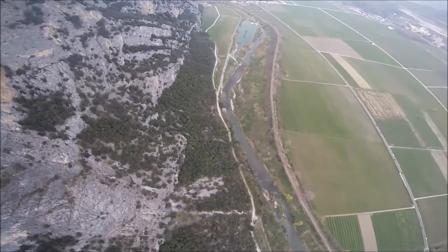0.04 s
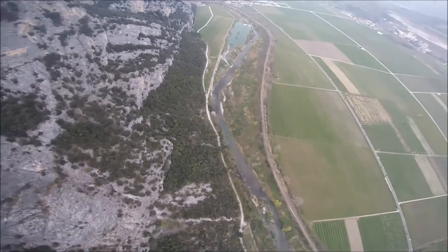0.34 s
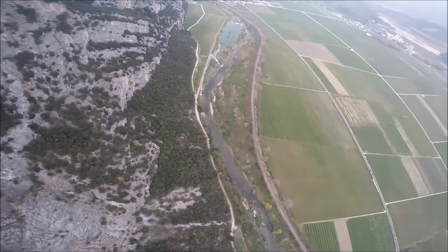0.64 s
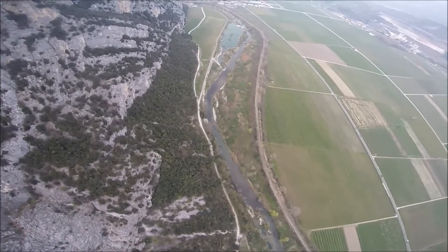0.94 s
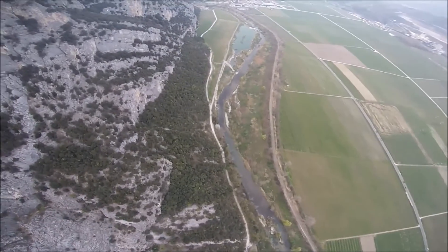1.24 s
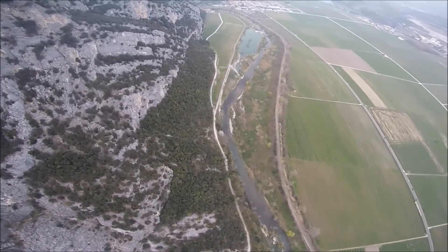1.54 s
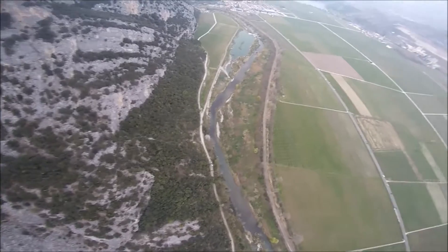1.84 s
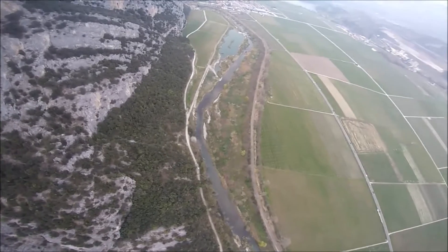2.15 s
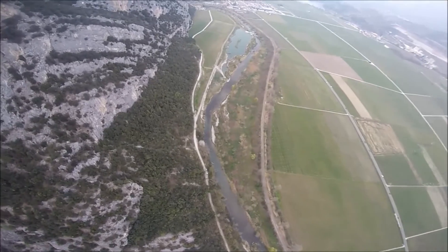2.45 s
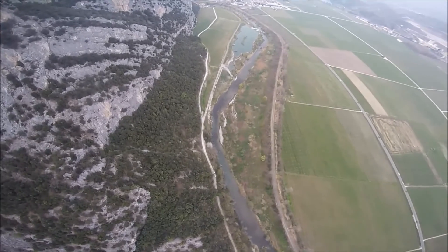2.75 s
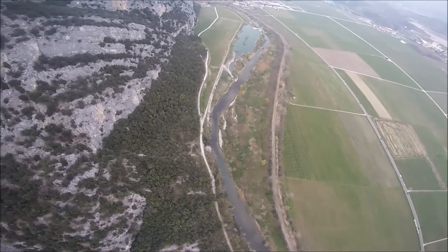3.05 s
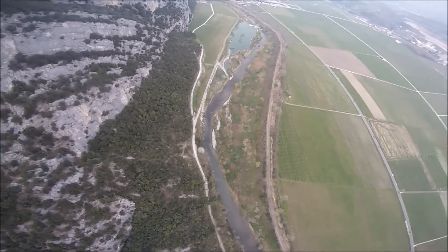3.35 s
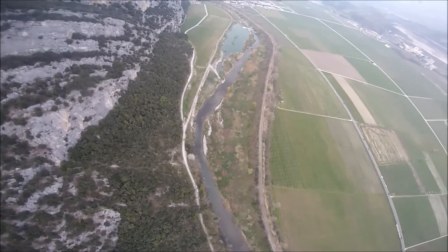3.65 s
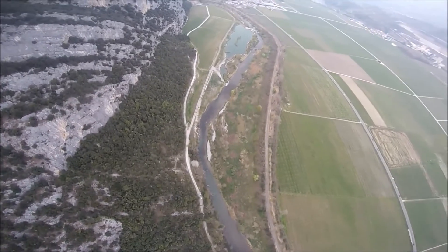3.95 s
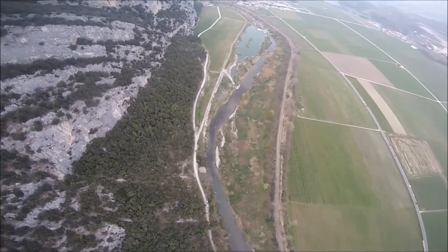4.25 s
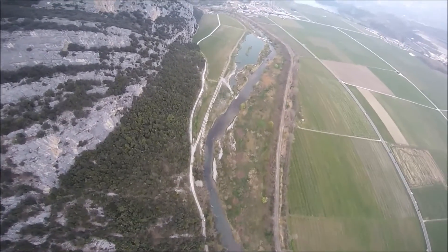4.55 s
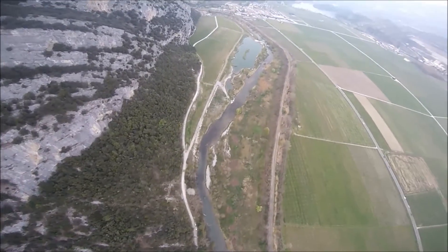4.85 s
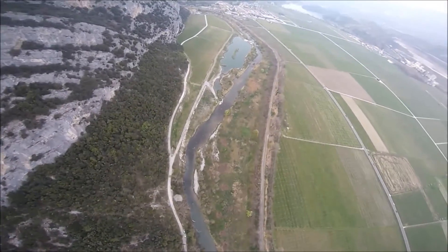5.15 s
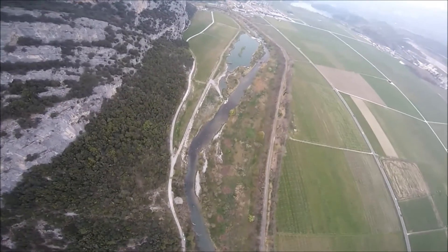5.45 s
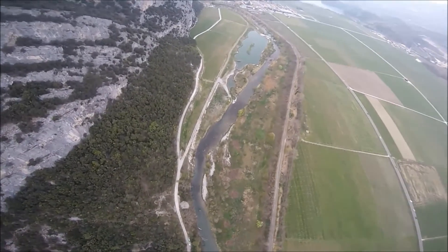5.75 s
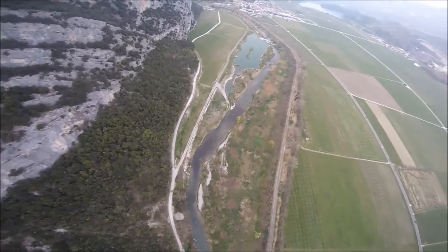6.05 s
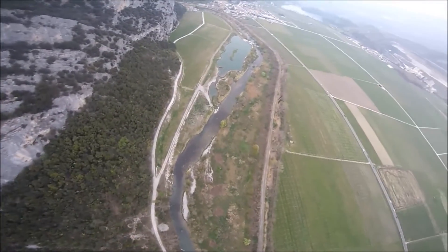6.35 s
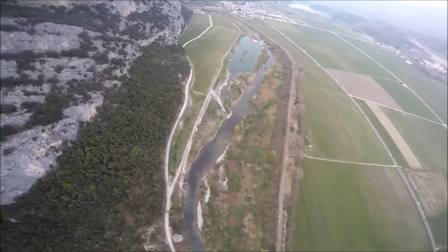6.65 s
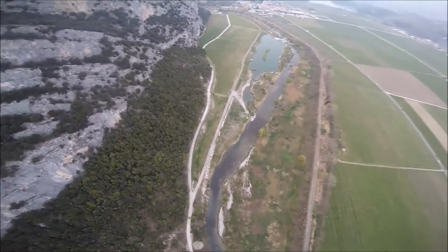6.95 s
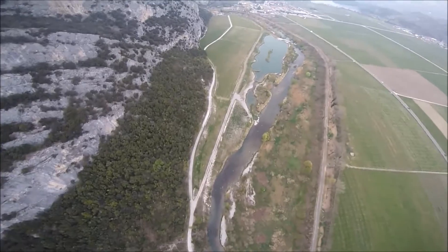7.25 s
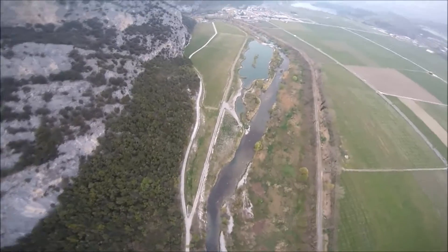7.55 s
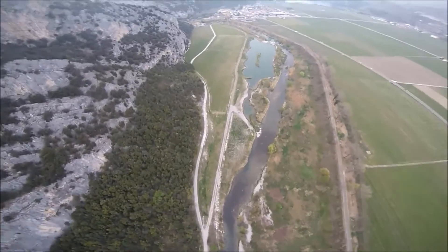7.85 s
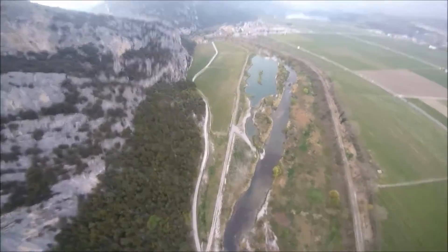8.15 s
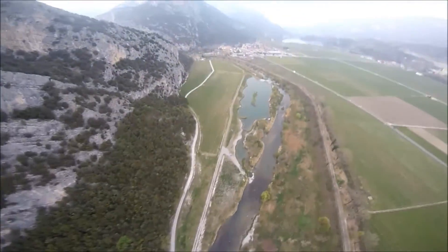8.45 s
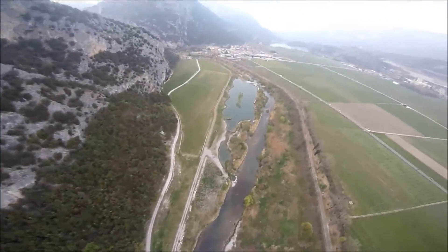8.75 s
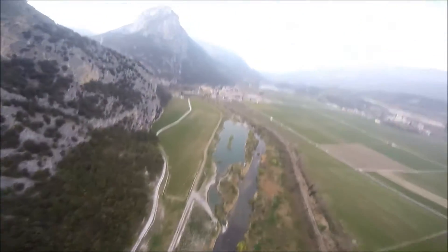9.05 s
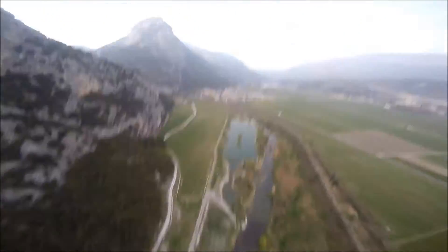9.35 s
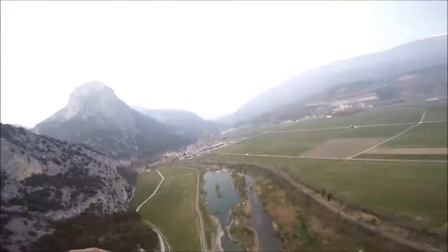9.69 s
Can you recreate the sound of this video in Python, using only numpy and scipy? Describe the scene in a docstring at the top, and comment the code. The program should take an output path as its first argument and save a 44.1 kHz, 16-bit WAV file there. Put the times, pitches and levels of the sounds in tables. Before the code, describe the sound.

Heard close from the helmet of someone falling along a rock face, turbulent air roars and hisses without pause, with low buffeting, fluttering clothing and a hollow whistling tone. Late on, the roar grows and short high swishes pass. Then the parachute cracks open twice in quick succession with deep harness tugs, the rush falls away sharply, and the canopy crackles and flaps faintly.

```python
"""Turbulent air roars through the resonant housing of a helmet camera in freefall beside a cliff.
A cavity howls, eddies thud and shake the mount, straps and suit flutter. Near the end edges whistle
and fabric streams out; the canopy opens with two hard snaps and heavy tugs, its cloth crackles,
and the wind drops to a few soft flaps."""
import sys
import numpy as np
from scipy import signal
from scipy.fft import rfft, irfft
from scipy.io import wavfile

SR = 44100
rng = np.random.default_rng(int(sys.argv[2]) if len(sys.argv) > 2 else 0)


def store_pcm(level_fs):
    """Save levels as 16-bit WAV."""
    pcm = np.round(np.clip(level_fs, -1, 1) * 32767).astype(np.int16)
    wavfile.write(sys.argv[1], SR, np.atleast_2d(pcm).T)


N = 437472
TIME_S = np.arange(N) / SR
BINS_HZ = np.maximum(np.fft.rfftfreq(N, 1 / SR), 1)
USUAL_TURBULENCE_DB = -37  # excess_db counts from here

# broad spectrum of air at the housing: f/Hz, level/dB
AIR_SPECTRUM = [(150, -21.5), (450, -19), (790, -18), (900, -8), (1290, -7.5), (1500, -1), (1900, 2.5),
                (3560, -0.5), (3740, -4), (4620, -8.5), (4880, -16.5), (7700, -25), (11300, -30.5),
                (15000, -43.5)]


def rush(churn, flow_gain, excess_db, lift):
    """Churning air through the housing: roar, mid band and hiss; the roar grows as the head lifts."""
    # housing peaks and dips: f/Hz, width/Hz, level/dB
    resonances = [(2410, 86, 2.5), (2680, 130, 4), (2840, 150, -0.5), (3100, 230, 2.5), (3430, 570, 4),
                  (4210, 160, 2), (4580, 140, 3.5), (5430, 340, 5), (5735, 230, 6), (6500, 400, -2),
                  (7130, 260, 2.5), (8300, 390, -5.5), (10740, 550, 2.5), (11900, 600, -1.5),
                  (12900, 500, 2.5)]
    housing = colour(AIR_SPECTRUM) * undb(sum(db * bell(BINS_HZ, hz, bw) for hz, bw, db in resonances))
    air = unit(noise() * churn * undb(0.63 * walk(660)))  # small vortices burst on the port
    low, body = below(1394, order=12), below(4620, order=8)
    roar = undb(1.26) * unit(shape(air, housing * low))
    middle = undb(0.5) * unit(shape(air, housing * (body - low)))
    hiss = undb(1.44) * unit(shape(air, housing * (1 - body)))
    visor_edge_db = 1.5 * bell(TIME_S, 7.56, 0.77)
    roar_gain = flow_gain * undb(-13.5 + 0.25 * excess_db + 8 * lift)
    hiss_gain = flow_gain * undb(-11.5 + 0.32 * excess_db + visor_edge_db)
    # finest eddies die first: the hiss dulls as it fades
    dull = shape(hiss, below(7500, order=8))
    brightness = np.minimum(unit(hiss_gain), 1) ** .2
    hiss = dull + brightness * (hiss - dull)
    return roar_gain * roar + flow_gain * middle + hiss_gain * hiss


def airflow():
    """Flow and turbulence in dB: steady flow in the fall, then the canopy streams out and brakes."""
    # canopy opening: t/s, flow/dB, turbulence/dB
    opening = [(8.9, -26.5, -40), (9.06, -30, -40), (9.2, -28.5, -37.5), (9.41, -28.5, -31.5),
               (9.48, -38, -39), (9.56, -43, -42), (9.645, -35.5, -44), (9.74, -56, -47), (9.86, -56, -49),
               (9.92, -50, -50)]
    # rough air in the fall: t/s, turbulence/dB
    fall = [(0.0, -31.5), (0.49, -31), (0.54, -37.5), (1.96, -32.5), (2.2, -39.5), (2.79, -34),
            (3.48, -33.5), (3.8, -39.5), (4.41, -35), (4.46, -34.5), (5.56, -39.5), (6.2, -35),
            (6.45, -41.5), (7.52, -39.5), (7.62, -37), (8.5, -39.5), (8.8, -45.5)]
    fall_end_s, fall_flow_db = fall[-1][0], -25
    opening_s, opening_db, _ = np.transpose(opening)
    flow_db = np.interp(TIME_S, [fall_end_s, *opening_s], [fall_flow_db, *opening_db])
    turbulence = list(fall) + [(s, db) for s, _, db in opening]
    return flow_db, np.interp(TIME_S, *np.transpose(turbulence))


def howl(churn, flow_gain, excess_db, lift, hz=1612, width_hz=215):
    """A cavity blown squarely: a breathy, drifting pitch, weakened by rough air and the lifting head."""
    # swells of the howl: t/s, length/s, level/dB
    flares = [(.58, .25, 3.5), (1.05, .2, 2.5), (3.715, 0.42, 1.5), (5.05, 0.55, 1.5), (4.25, .4, 0.8),
              (6.4, .6, 1.2), (8.72, .3, 3)]
    start_s, end_s, half_fade_s = .48, 8.93, .03
    blown = np.clip(np.minimum(TIME_S - start_s, end_s - TIME_S) / (2 * half_fade_s) + .5, 0, 1)
    flare_db = sum(db * bell(TIME_S, s, length_s) for s, length_s, db in flares)
    drive_db = blown * (-4.0 - 6.5 * lift + flare_db) - 7 * (1 - blown)
    level_db = drive_db - 0.39 * excess_db - 0.44
    ring = breathy(hz * (1 + 0.01009 * walk(7.11)), width_hz)
    return flow_gain * undb(level_db) * unit(ring * churn)


def buffeting(gust, flow_gain, excess_db, mount_hz=82, mount_width_hz=16, mount_db=-11.5):
    """Large eddies thud on the helmet, straps and suit flutter, the flow keeps the mount ringing."""
    # heavy gusts: t/s, length/s, level/dB
    gusts = [(.12, .12, -28), (.31, .17, -21.5), (.51, 0.1, -25), (1.41, 0.15, -23), (2.148, .2, -32),
             (3.85, 0.4, -30), (4.407, .09, -26), (5.345, 0.2, -29.5), (6.26, .2, -27.5), (8.86, 0.39, -33),
             (9.227, 0.17, -22), (9.496, .07, -20)]
    # pressure spectrum of large eddies: f/Hz, level/dB
    eddy_spectrum = [(8, -33), (20, -12), (30, 0), (42, 0.5), (60, -1.5), (82, 2.5), (100, -1.5),
                     (125, -11.5), (180, -28.5), (400, -74)]
    # spectrum of straps and suit: f/Hz, level/dB
    flutter_spectrum = [(80, -10), (130, -1), (165, 0), (195, -1.5), (212, 1), (235, -2), (310, -3),
                        (400, -14), (700, -20.5), (1500, -30), (6000, -75)]
    heavy = sum(undb(db) * bell(TIME_S, s, length_s) for s, length_s, db in gusts)
    thud_gain = np.hypot(undb(-31.5 + 0.75 * excess_db), heavy)
    flutter_gain = undb(USUAL_TURBULENCE_DB + excess_db)
    thuds = unit(shape(noise(), colour(eddy_spectrum)) * undb(0.33 * gust))
    flutter = unit(shape(noise(), colour(flutter_spectrum)) * undb(0.23 * gust))
    shudder = unit(shape(noise(), resonance(mount_hz, mount_width_hz)))
    return thud_gain * thuds + flutter_gain * flutter + undb(mount_db) * flow_gain * shudder


def canopy(roughness=0.7, crack_t60_s=0.012, overtone_ratio=1.82, overtone_db=-11):
    """Lines snap taut with a crack and a short two-mode ring; harness tugs rock the helmet."""
    # risers and fabric: t/s, ring level/dB, ring f/Hz, ring t60/s, crack level/dB, crack f/Hz
    snaps = [(9.4292, -1.5, 2200, 0.019, -11, 8200), (9.4669, 0.5, 1774, 0.018, -10, 1000),
             (9.469, -1, 1800, 0.0092, -6, 1140), (9.619, -17, 1890, 0.011, -16, 1200),
             (9.632, -19, 1900, 0.011, -16, 1190), (9.698, -35, 3330, 0.033, -25, 3400),
             (9.779, -33, 1690, 0.046, -28, 1100), (9.876, -38, 1900, .025, -28, 3800),
             (9.908, -49, 3400, .03, -48, 3800)]
    # harness tugs: t/s, level/dB, f/Hz, t60/s
    tugs = [(9.431, -6, 54, .07), (9.476, 3.5, 80.5, 0.059), (9.505, -4.5, 41.7, 0.077),
            (9.554, -15.5, 84, 0.21), (9.644, -12, 79.6, 0.13), (9.792, -12.5, 73.6, 0.069),
            (9.819, -27, 90, 0.36), (9.888, -21, 95, .2)]
    out = np.zeros(N)
    for s, ring_db, hz, t60_s, crack_db, crack_hz in snaps:
        age_s, ring = impact(s, t60_s, rise_s=0.0016)
        phase = 2 * np.pi * hz * age_s
        modes = np.sin(phase) + undb(overtone_db) * np.sin(overtone_ratio * phase)
        out += undb(ring_db) * ring * (1 + roughness * walk(510)) * modes
        # the crack passes the same housing as the wind
        crack = unit(shape(noise(), resonance(crack_hz, .5 * crack_hz) * colour(AIR_SPECTRUM)))
        _, burst = impact(s, crack_t60_s, rise_s=0.0005)
        out += undb(crack_db) * burst * crack
    for s, db, hz, t60_s in tugs:
        age_s, ring = impact(s, t60_s, rise_s=0.0026)
        out -= undb(db) * ring * np.sin(2 * np.pi * hz * age_s)
    return out


def whistles(flow_gain):
    """Narrow hisses swell, glide and fade as edges, lines and fabric turn into the wind."""
    # swishes: t/s, length/s, f/Hz, width/Hz, level/dB re flow, glide/(octaves per s)
    swishes = [(8.1, 0.4, 4900, 450, -15, 0), (8.346, .26, 10400, 950, -20.5, -.05),
               (8.33, .22, 8550, 700, -25.5, -.2), (8.378, 0.13, 4850, 700, -7, -0.81),
               (8.455, .14, 4300, 500, -5, 0), (8.73, .45, 10650, 480, -24.5, 0),
               (8.8, .55, 7600, 600, -22.5, 0), (8.893, .14, 1126, 180, -6.5, .5),
               (9.3, 0.5, 2305, 520, 1, 0), (9.293, .28, 1770, 380, -0.5, 0),
               (9.28, .24, 12450, 900, -29, .15)]
    out = np.zeros(N)
    for s, length_s, hz, width_hz, db, glide in swishes:
        pitch_hz = hz * 2 ** (glide * np.clip(TIME_S - s, -length_s, length_s))
        out += undb(db) * bell(TIME_S, s, 0.89 * length_s) * breathy(pitch_hz, width_hz)
    return flow_gain * out


def rustle(at_s=9.62, length_s=.13, level_db=-44, creases_per_s=350, hz=1900, width_hz=2600):
    """Creases pop out of the filling cloth as small random clicks."""
    creases = (rng.random(N) < creases_per_s / SR) * noise()
    cloth = unit(shape(creases, colour(AIR_SPECTRUM) * resonance(hz, width_hz)))
    return undb(level_db) * bell(TIME_S, at_s, length_s) * cloth


def impact(at_s, t60_s, rise_s):
    """Time since an impact and its envelope: quick rise, exponential decay."""
    age_s = np.clip(TIME_S - at_s, 0, 1)
    return age_s, (1 - np.exp(-age_s / rise_s)) * np.exp(-np.log(1000) * age_s / t60_s)


def breathy(hz, width_hz):
    """Narrow noise band around a moving pitch, rms 1."""
    phase = 2 * np.pi * np.cumsum(hz) / SR
    return walk(width_hz / 2) * np.cos(phase) + walk(width_hz / 2) * np.sin(phase)


def walk(hz):
    """Random wavering up to hz, rms 1."""
    return unit(signal.sosfilt(signal.butter(2, hz, fs=SR, output="sos"), noise()))


def noise():
    """White noise."""
    return rng.standard_normal(N)


def shape(x, response):
    """Filter by a frequency response."""
    return irfft(rfft(x) * response, N)


def colour(points):
    """Response through (f/Hz, level/dB) points."""
    hz, db = np.transpose(points)
    return undb(np.interp(np.log(BINS_HZ), np.log(hz), db))


def resonance(hz, width_hz):
    """Damped resonator response, gain 1 at hz."""
    return 1 / (1 + 1j * (BINS_HZ ** 2 - hz ** 2) / (BINS_HZ * width_hz))


def below(hz, order):
    """Low-pass response, gain 1/2 at hz."""
    return 1 / (1 + (BINS_HZ / hz) ** order)


def bell(x, centre, width):
    """Gaussian of height 1; full width at half height."""
    return .5 ** ((2 * (x - centre) / width) ** 2)


def undb(db):
    """Decibels to gain."""
    return 10 ** (np.asarray(db) / 20)


def unit(x):
    """Scale to rms 1."""
    return x / np.sqrt(np.mean(x ** 2))


def scene(lift_start_s=6.5, lift_end_s=9.15):
    """One turbulent flow drives rush, howl, buffeting and whistles; the head lifts, the canopy opens."""
    flow_db, turbulence_db = airflow()
    flow_gain = undb(flow_db)
    excess_db = turbulence_db - USUAL_TURBULENCE_DB
    lift = np.clip((TIME_S - lift_start_s) / (lift_end_s - lift_start_s), 0, 1) ** 2
    gust = walk(32)
    churn = undb(.5 * gust + 0.22 * walk(93))
    wind = rush(churn, flow_gain, excess_db, lift) + howl(churn, flow_gain, excess_db, lift)
    return (wind + buffeting(gust, flow_gain, excess_db) + whistles(flow_gain) + rustle() + canopy())[None]


def record(dry, ceiling=0.51, cutoff_hz=15300):
    """The camera soft-clips the hardest peaks and cuts the top."""
    clipped = dry / (1 + (dry / ceiling) ** 8) ** (1 / 8)
    return signal.sosfilt(signal.ellip(12, .1, 80, cutoff_hz, fs=SR, output="sos"), clipped)


dry = scene()
out = record(dry)
store_pcm(out)
```